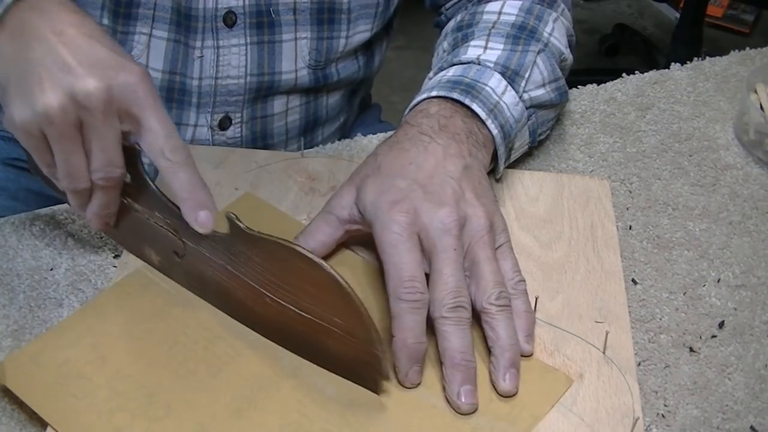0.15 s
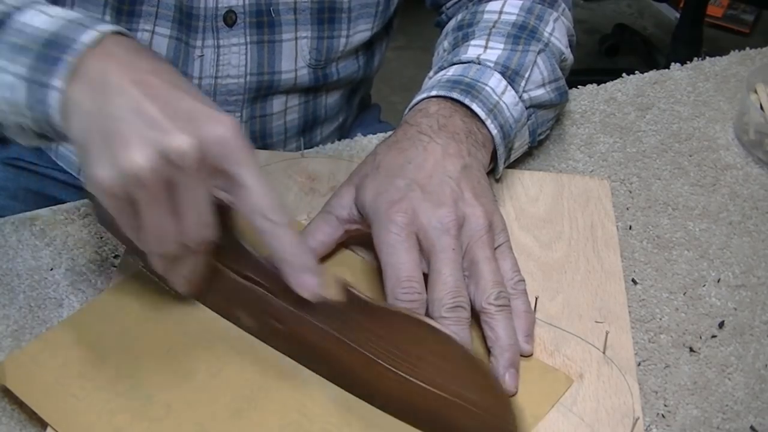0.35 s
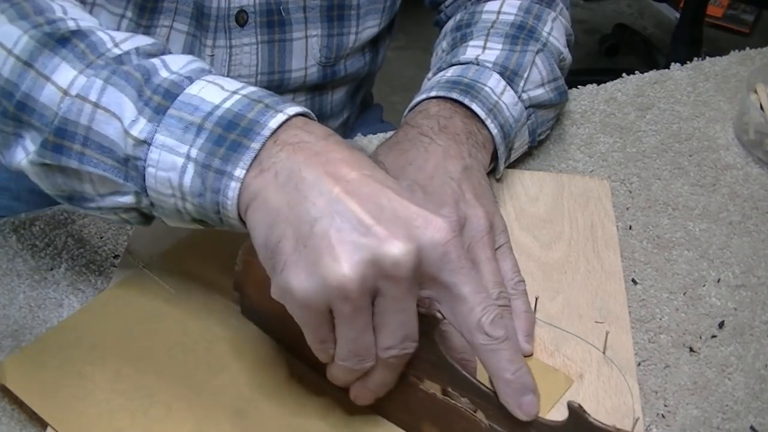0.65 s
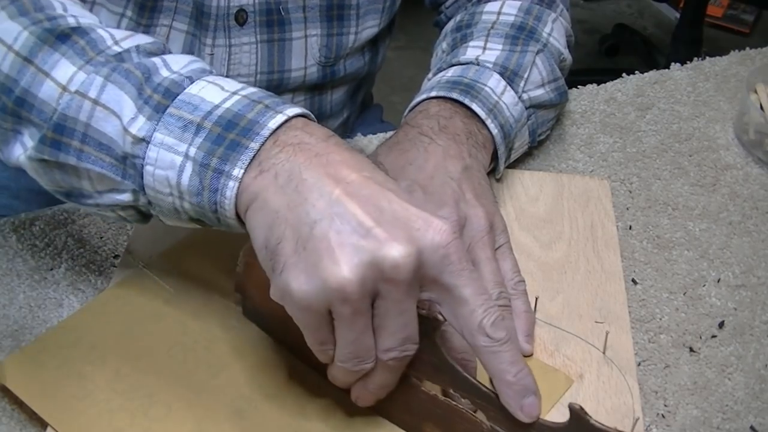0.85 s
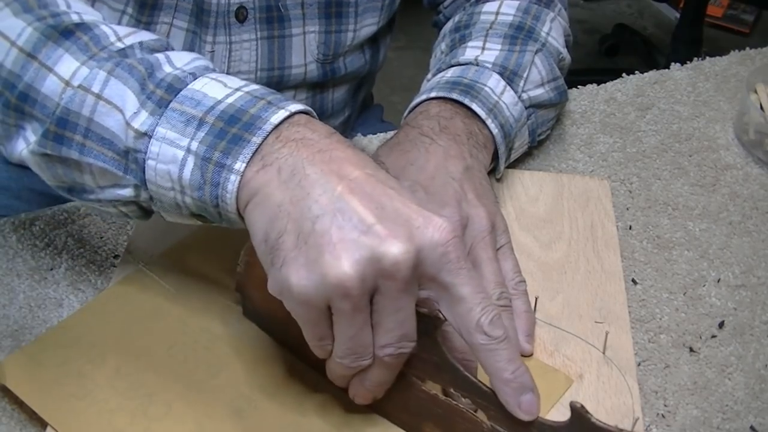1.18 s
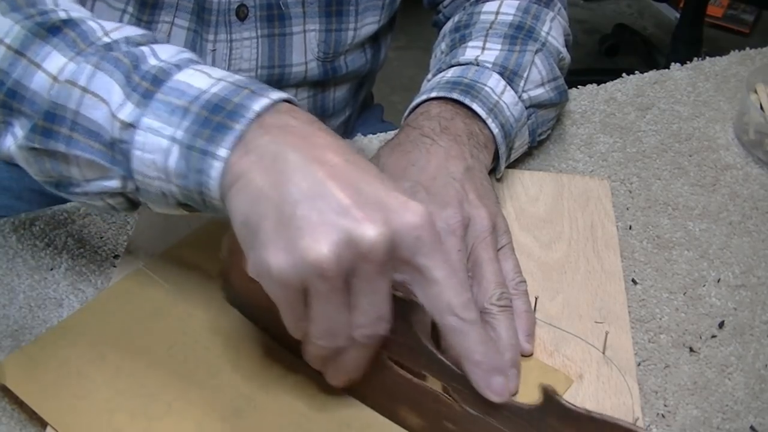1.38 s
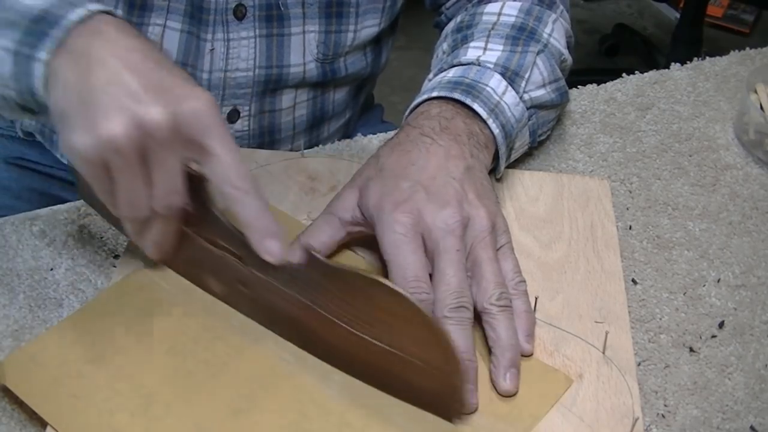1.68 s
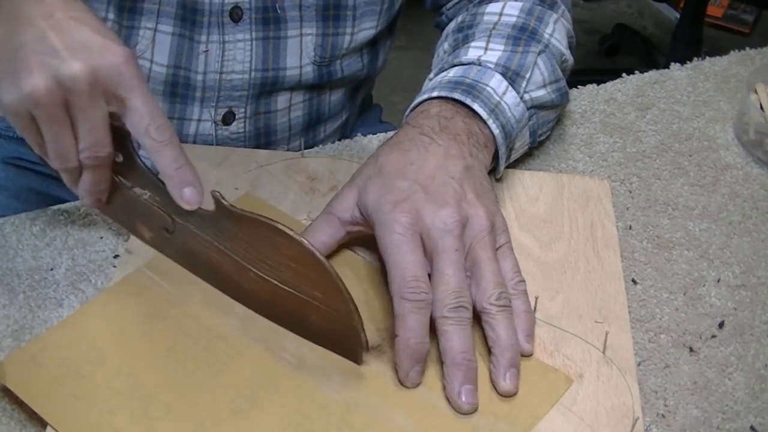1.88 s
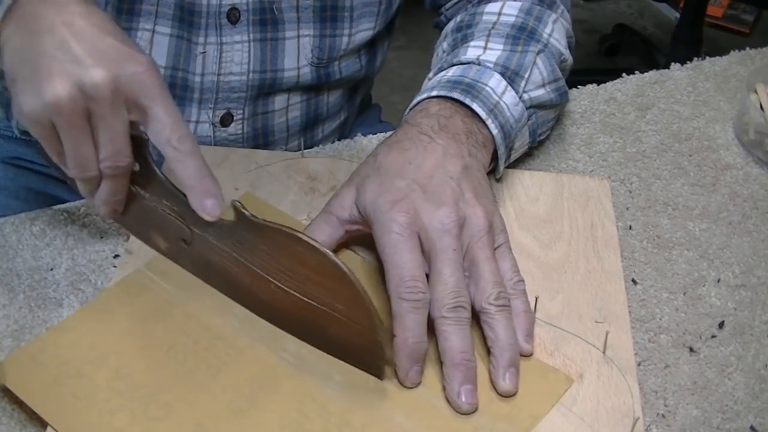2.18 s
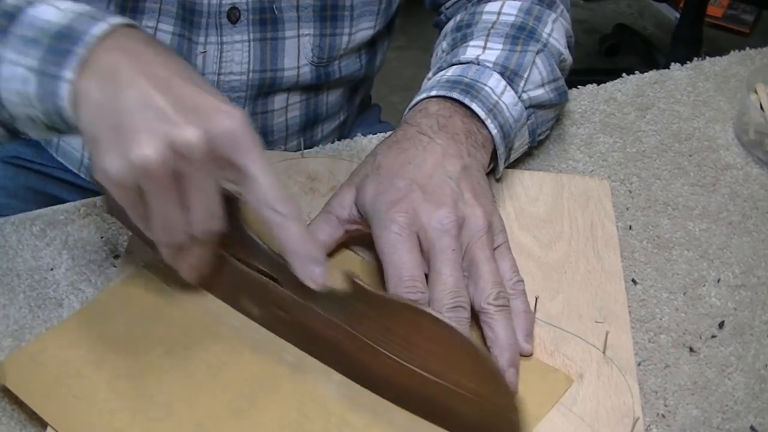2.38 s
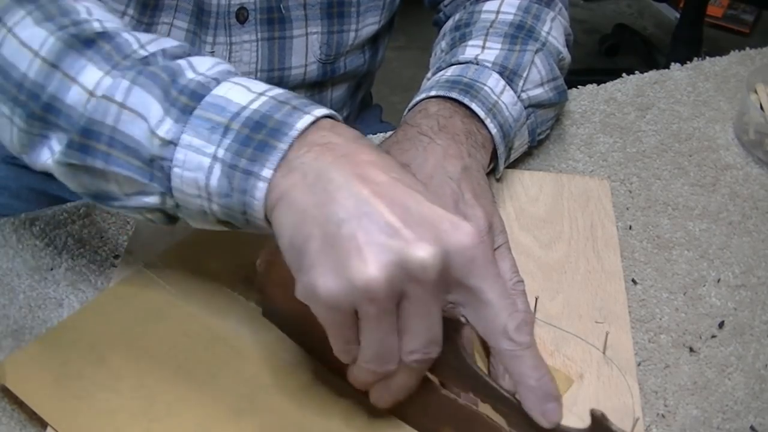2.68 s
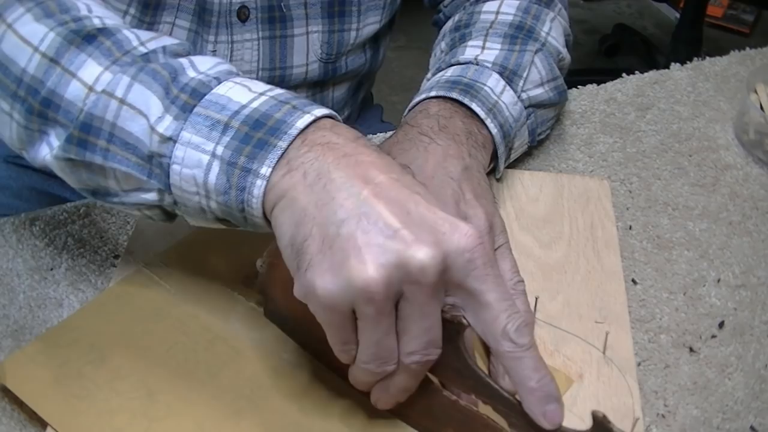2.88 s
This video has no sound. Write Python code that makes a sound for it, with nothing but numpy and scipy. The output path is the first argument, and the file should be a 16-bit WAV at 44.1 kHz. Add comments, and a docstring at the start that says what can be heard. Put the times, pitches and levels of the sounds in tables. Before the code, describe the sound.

A wooden edge scrapes over sandpaper on a flat board in three slow, gritty strokes. A short pause follows the first; the other two run together, with soft bumps. Heard close, straight ahead, in a quiet small workshop.

```python
"""A gritty scrape swells and fades three times: a wooden edge rubbed out, back and out again over
sandpaper on a flat board. Thousands of grit points catch the wood; the faster it slides, the denser
and louder the scrape. The catches ring the wooden piece and the board. Single grains snap, and the
wood rocks with soft bumps. Faint mains hum and the noise of a small workshop fill the pauses."""
import sys
import numpy as np
from scipy import signal
from scipy.fft import rfft, irfft, next_fast_len
from scipy.io import wavfile
from scipy.ndimage import uniform_filter1d

SR = 44100
rng = np.random.default_rng(int(sys.argv[2]) if len(sys.argv) > 2 else 0)


def store_pcm(level_fs):
    """Save levels as 16-bit WAV."""
    pcm = np.round(np.clip(level_fs, -1, 1) * 32767).astype(np.int16)
    wavfile.write(sys.argv[1], SR, np.atleast_2d(pcm).T)


N = 134505
TIME_S = np.arange(N) / SR


def amp(db):
    """Decibels to gain."""
    return 10 ** (np.asarray(db) / 20)


def unit_rms(x):
    """Scales to rms 1."""
    return x / np.sqrt(np.mean(x ** 2) + 1e-20)


def curve_at(points, hz):
    """Reads (Hz, value) points on a log-frequency axis."""
    point_hz, value = np.transpose(points)
    return np.interp(np.log(hz + 1), np.log(point_hz + 1), value)


def colour(x, points, sign=1):
    """Filters by (Hz, dB) points; sign=-1 inverts the curve."""
    size = next_fast_len(N + 4096)
    gain = amp(sign * curve_at(points, np.fft.rfftfreq(size, 1 / SR)))
    return irfft(rfft(x, size) * gain, size)[..., :N]


def lowpass(order, hz):
    """Butterworth low-pass sections."""
    return signal.butter(order, hz, fs=SR, output="sos")


def ring(x, modes):
    """Parallel resonances of (Hz, width Hz, dB)."""
    return sum(amp(db) * signal.lfilter(*signal.iirpeak(hz, hz / width, SR), x)
               for hz, width, db in modes)


def ring_steeply(x, modes):
    """Parallel resonances, each applied twice for deeper valleys between them."""
    return sum(ring(ring(x, [(hz, width, 0)]), [(hz, width, db)]) for hz, width, db in modes)


def swell(centre_s, sigma_s):
    """A Gaussian rise and fall."""
    return np.exp(-.5 * ((TIME_S - centre_s) / sigma_s) ** 2)


def catches(speed, full_speed_per_s=14000, spread_db=2, chatter_db=0.6, chatter_hz=130):
    """Clicks of grit catching wood: denser with speed, uneven in size, clumped by chatter."""
    chance = np.clip(full_speed_per_s * np.sqrt(speed) / SR, 1e-3, 1)
    size = amp(spread_db * np.minimum(rng.exponential(1, N), 5)) * rng.choice([-1, 1], N)
    clicks = size * (rng.random(N) < chance) / np.sqrt(chance)
    chatter = unit_rms(signal.sosfilt(lowpass(2, chatter_hz), rng.standard_normal(N)))
    return unit_rms(clicks * amp(chatter_db * chatter))


# The three strokes. Each row: time in seconds, then relative levels in dB of the scrape, the fizz,
# the board's middle ring and its low ring.
PUSH = [
    (0.0, -65, -70, -58, -67), (0.01, -50.5, -58, -50, -56), (0.08, -61.5, -71, -60, -60),
    (0.112, -49.5, -54, -52, -56), (0.194, -32, -39, -37.5, -39), (0.288, -22.5, -33.5, -33.5, -36),
    (0.496, -19.5, -21.5, -33, -44.5), (0.6, -20, -25, -27, -34), (0.644, -22.5, -31.5, -27.5, -39),
    (0.714, -30.5, -42, -34.5, -47), (0.738, -34.5, -56, -34.5, -39.5), (0.792, -51, -76, -51, -60),
    (0.872, -67, -81, -67, -62), (0.9, -67, -73, -59, -59)]
PULL = [
    (1.24, -63, -76, -60, -68), (1.364, -51, -60, -53.5, -53), (1.4, -35.5, -48, -36, -39),
    (1.502, -23, -28.5, -29.5, -33.5), (1.588, -20.5, -25, -29, -41), (1.652, -19.5, -22, -27.5, -32.5),
    (1.694, -21, -24, -31, -40.5), (1.814, -19, -26.5, -33, -32), (1.86, -25, -26.5, -32, -31),
    (1.898, -24, -28.5, -39, -38), (1.92, -24, -32, -33, -32.5), (1.958, -29, -33.5, -29.5, -36.5),
    (1.998, -43, -56, -44, -40.5), (2.04, -54, -71, -52, -68)]
PUSH_AGAIN = [
    (2.05, -57, -64, -54, -69), (2.084, -45, -55, -54, -66), (2.156, -41.5, -49, -41.5, -47.5),
    (2.186, -38, -47, -41.5, -49), (2.264, -28, -34.5, -34, -31), (2.342, -24, -27.5, -33, -39.5),
    (2.412, -20, -26.5, -30, -35.5), (2.572, -18.5, -22, -32.5, -43), (2.64, -20, -25, -25.5, -42),
    (2.698, -21, -29.5, -24, -33.5), (2.764, -28, -39, -31, -37), (2.864, -56.5, -84, -59, -58),
    (2.916, -62, -77, -69, -57), (2.95, -64, -72, -57, -64)]
# Scrape of the grit, fizz of the finest grit. Each row: frequency in Hz, relative density in dB.
SCRAPE_SPECTRUM = [(100,-32),(300,-13.5),(800,-10),(1700,-5.5),(2800,1.5),(3400,-1),(4400,0.5),(5400,0.5),(7000,-0.5),(8600,-5),(9800,-12),(12000,-11),(16000,-30)]
FIZZ_SPECTRUM = [(500,-30),(5000,-15),(8000,6),(9700,6.5),(10400,3),(11300,3.5),(13000,-5),(14500,-4),(16000,-11)]
# Resonances of piece and board. Each row: frequency in Hz, width in Hz, relative gain in dB.
PIECE_MAIN_MODES = [(2106,206,-1.5),(2243,135,-3),(2563,380,-11)]
PIECE_UPPER_MODES = [(3950,160,-6.5),(4460,370,-7.5),(6070,460,-9),(7200,470,-5.5),(8300,220,-4),(8600,200,-18),(9550,240,-6.5)]
BOARD_MIDDLE_MODES = [(940,12,-3.5),(1000,63,0),(1109,40,2),(1220,52,-4),(1370,165,-8.5),(1525,160,-5),(1787,300,-15.5)]
BOARD_LOW_MODES = [(100,38,-20),(173.5,69,-15.5),(285,138,-19),(395,90,-14.5),(490.5,22,-0.5),(560.5,23.5,3.5),(615,59,-4.5),(697,43,-7.5),(762,31,-6)]


def sanding(full_speed_db=-17.5, smooth_s=.02, piece_growth=1.22):
    """The grit hisses directly and rings the wooden piece and the board."""
    times_s, *levels_db = np.transpose(PUSH + PULL + PUSH_AGAIN)
    # The hand changes speed and pressure gradually.
    scrape, fizz, middle, low = (
        amp(uniform_filter1d(np.interp(TIME_S, times_s, db), round(smooth_s * SR))) for db in levels_db)
    speed = scrape / amp(full_speed_db)
    piece = amp(full_speed_db) * speed ** piece_growth
    grit = catches(speed)
    out = amp(-.5) * scrape * unit_rms(colour(catches(speed), SCRAPE_SPECTRUM))
    out += amp(-.5) * fizz * unit_rms(colour(catches(speed), FIZZ_SPECTRUM))
    out += amp(-7) * piece * unit_rms(ring_steeply(grit, PIECE_MAIN_MODES))
    out += amp(-9) * scrape * unit_rms(ring(grit, PIECE_UPPER_MODES))
    out += amp(-.5) * middle * unit_rms(ring(catches(speed), BOARD_MIDDLE_MODES))
    return out + low * unit_rms(ring_steeply(catches(speed), BOARD_LOW_MODES))


def contact_drift(x, depth_db=1.37, patch_hz=260, patch_s=.11):
    """The changing contact shifts the colour of the scrape in random patches."""
    frame, hop = 512, 128
    spectra = signal.stft(x, SR, nperseg=frame, noverlap=frame - hop)[2]
    patches = rng.standard_normal(spectra.shape)
    patches = uniform_filter1d(patches, round(patch_hz * frame / SR), axis=0)
    patches = uniform_filter1d(patches, round(patch_s * SR / hop), axis=1)
    spectra *= amp(depth_db * unit_rms(patches))
    return signal.istft(spectra, SR, nperseg=frame, noverlap=frame - hop)[1][:N]


# Each row: frequency in Hz, relative density in dB.
AIR_SPECTRUM = [(25,-12),(45,-37),(70,-23),(95,-6),(180,-7),(260,-8.5),(430,-6.5),(600,-13.5),(1000,-13.5),(2000,-20),(5000,-25.5),(10000,-31.5),(15500,-39)]


def air(level_db=-53):
    """Steady room noise."""
    return amp(level_db) * unit_rms(colour(rng.standard_normal(N), AIR_SPECTRUM))


# Each row: frequency in Hz, rms level in dB.
HUM_PARTIALS = [(59.8,-57),(179,-64),(420,-61),(540,-66)]


def hum():
    """Mains hum with a few overtones."""
    return sum(amp(db) * np.sqrt(2) * np.sin(2 * np.pi * (hz * TIME_S + rng.random()))
               for hz, db in HUM_PARTIALS)


# Each row: start in seconds, level in dB before filtering.
GRAIN_SNAPS = [(.012,-33),(0.172,-16),(1.028,-31.5),(2.086,-28),(2.819,-38)]
# Each row: frequency in Hz, gain in dB.
SNAP_SPECTRUM = [(300, -23), (2000, -18), (5000, -5), (11000, -9.5), (16000, -16)]


def snaps(decay_s=0.0013):
    """Single grains snap with short bright ticks."""
    envelope = sum(amp(db) * (TIME_S >= start_s) * np.exp(-abs(TIME_S - start_s) / decay_s)
                   for start_s, db in GRAIN_SNAPS)
    return colour(envelope * rng.standard_normal(N), SNAP_SPECTRUM)


# Each row: centre in seconds, sigma in seconds, frequency in Hz, width in Hz, level in dB.
EDGE_SWELLS_AND_CATCH = [(0.372,0.039,2515,130,-28),(0.423,0.005,3220,2200,-21),(0.522,0.025,2160,220,-26),(.63,.03,1143,154,-32.5),(1.414,0.018,500,70,-36),(1.603,0.055,2120,180,-27),(1.643,0.084,1373,90,-32.5),(1.779,0.028,3950,200,-25.5),(1.87,0.059,885,130,-33.5),(2.443,.035,3920,160,-26.5),(2.48,0.047,115,50,-49),(2.546,0.019,2220,200,-34),(2.71,0.025,1110,130,-29)]


def edge_swells_and_catch():
    """Single bands sing up as the contact point slides, or the edge catches with a brief broad tick."""
    out = np.zeros(N)
    for centre_s, sigma_s, hz, width_hz, db in EDGE_SWELLS_AND_CATCH:
        band = ring_steeply(rng.standard_normal(N), [(hz, width_hz, 0)])
        out += amp(db) * swell(centre_s, sigma_s) * unit_rms(band)
    return out


# Each row: centre in seconds, half length in seconds.
BASS_DIPS = [(0.523,0.04),(1.62,0.052),(2.625,0.031)]


def dip_bass(x, below_hz=200, depth_db=-38):
    """The bass dips briefly at the height of each stroke."""
    dip = sum(np.exp(-((TIME_S - centre_s) / half_s) ** 4) for centre_s, half_s in BASS_DIPS)
    bass = signal.sosfiltfilt(lowpass(4, below_hz), x)
    return x - bass * (1 - amp(depth_db * dip))


# Each row: start in seconds, energy in dB.
BUMPS = [(1.105,-19.5),(1.748,-18),(2.505,-15)]
# Each row: frequency in Hz, width in Hz, relative gain in dB.
BUMP_MODES = [(90,60,-6),(200,130,3),(320,120,-14)]


def bumps(cutoff_hz=600):
    """The wood rocks on the board with dull knocks."""
    force = signal.sosfilt(lowpass(2, cutoff_hz), signal.unit_impulse(SR // 10))
    knock = ring(force, BUMP_MODES)
    hits = sum(amp(db) * (np.arange(N) == round(start_s * SR)) for start_s, db in BUMPS)
    return signal.fftconvolve(hits, knock / np.linalg.norm(knock))[:N]


# Each row: centre in seconds, sigma in seconds, level in dB.
RUBS = [(1.158,0.014,-51.5),(1.294,.03,-52.5),(2.95,0.035,-63)]
# Each row: frequency in Hz, relative density in dB.
RUB_SPECTRUM = [(300,-15),(1000,1),(1700,3),(3000,-5),(6000,-9),(10000,-16),(16000,-21)]


def rubs():
    """The resting wood shifts a little on the paper."""
    envelope = sum(amp(db) * swell(centre_s, sigma_s) for centre_s, sigma_s, db in RUBS)
    return envelope * unit_rms(colour(rng.standard_normal(N), RUB_SPECTRUM))


# Each row: frequency in Hz, time to fall 60 dB in seconds.
ROOM_T60 = [(200,0.17),(2000,0.38),(8000,0.073),(16000,0.28)]


def room(x, level_db=-13):
    """The workshop's short diffuse tail, dying fastest near 8 kHz."""
    hz, t, spectra = signal.stft(rng.standard_normal(SR // 2), SR, nperseg=256)
    decay = amp(-60 * t / curve_at(ROOM_T60, hz)[:, None])
    tail = signal.istft(spectra * decay, SR, nperseg=256)[1]
    return amp(level_db) * signal.fftconvolve(x, tail / np.linalg.norm(tail))[:N]


def handwork():
    """The wood's friction on the paper, with its room tail."""
    work = contact_drift(sanding()) + edge_swells_and_catch() + rubs() + snaps()
    return work + room(work)


# Stereo width. Each row: frequency in Hz, side gain in dB.
SIDE_SPECTRUM = [(60,-5),(150,-12.5),(300,-13),(750,-16.5),(1200,-16),(2200,-23),(4500,-20.5),(8000,-15.5),(12300,-14),(13500,-7.5),(16000,-7)]
# Each row: frequency in Hz, left gain in dB (negated on the right).
BALANCE = [(60,-.1),(140,-.7),(1000,-0.37),(8000,-.1),(12500,-0.3),(16000,-2.5)]


def scene():
    """The work is straight ahead; a weaker, independent side signal gives it width."""
    mid = handwork() + bumps() + air() + hum()
    side = colour(handwork(), SIDE_SPECTRUM) + amp(-21) * air()
    left = colour(mid + side, BALANCE)
    right = colour(mid - side, BALANCE, sign=-1)
    return dip_bass(np.array([left, right]))


def record(dry):
    """A steep band limit at 15.8 kHz."""
    taps = signal.firwin(511, 15800, window=("kaiser", 9), fs=SR)
    return signal.oaconvolve(dry, taps[None], "same")


dry = scene()
out = record(dry)
store_pcm(out)
```